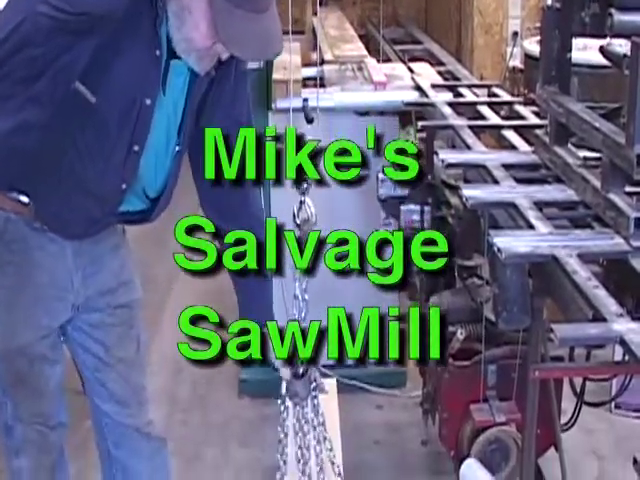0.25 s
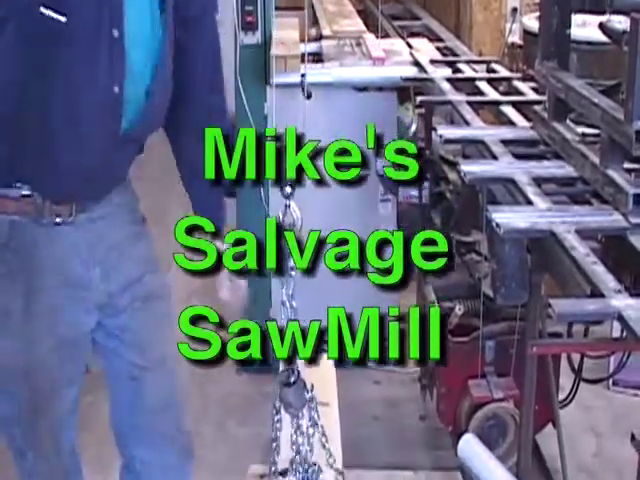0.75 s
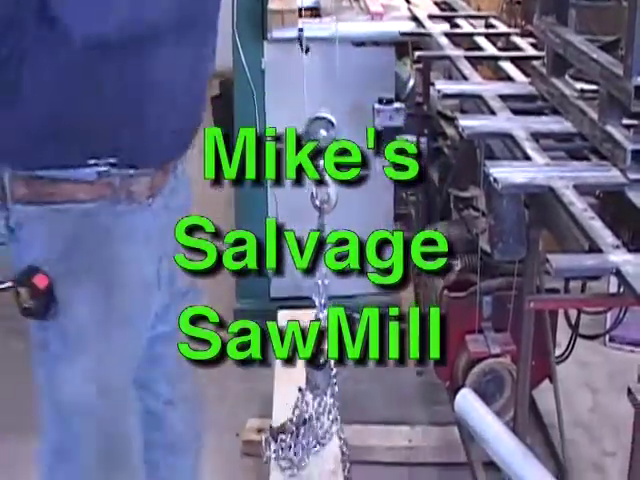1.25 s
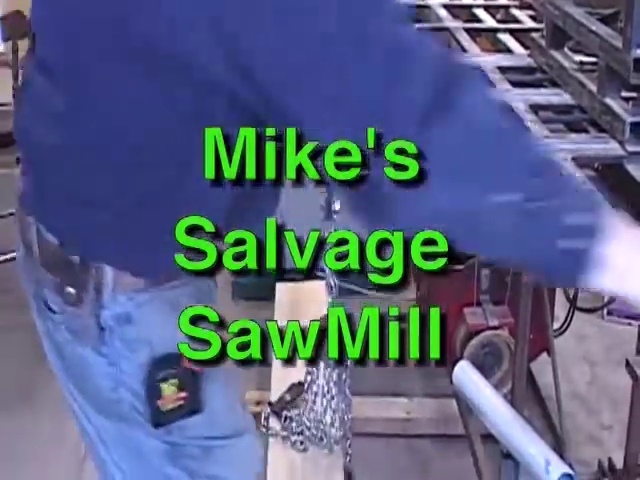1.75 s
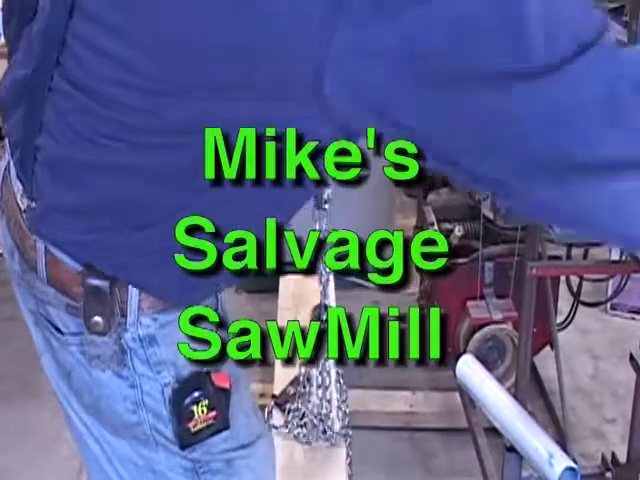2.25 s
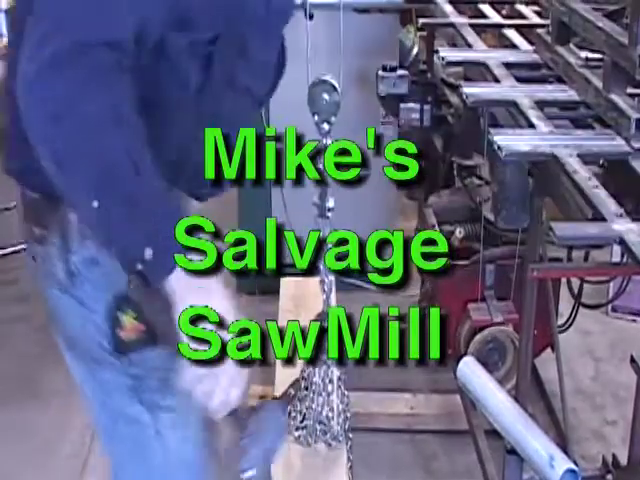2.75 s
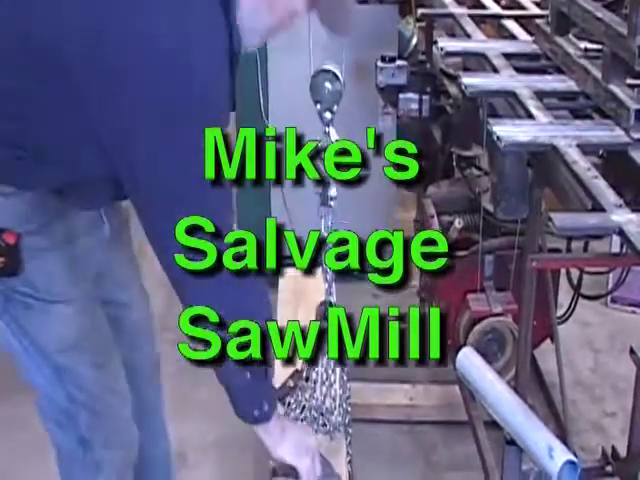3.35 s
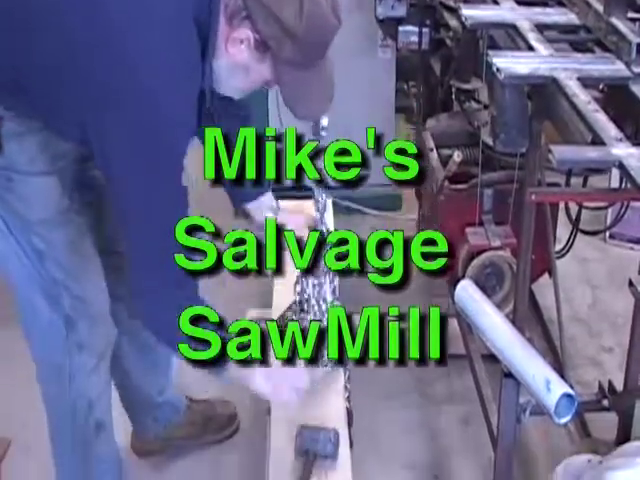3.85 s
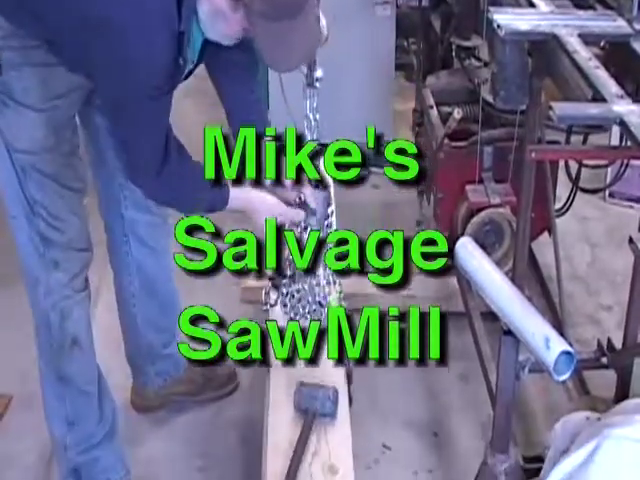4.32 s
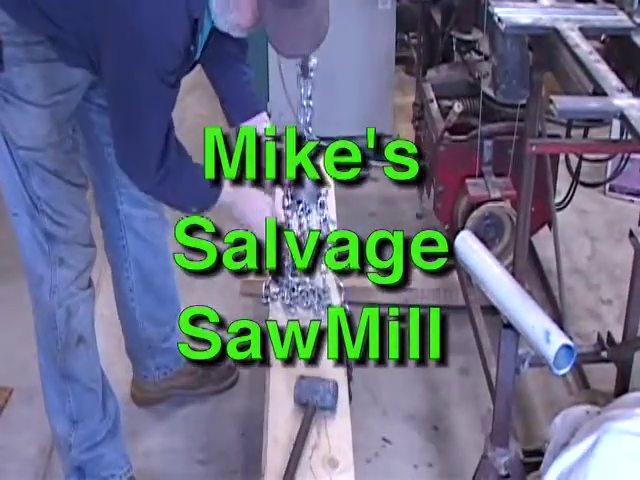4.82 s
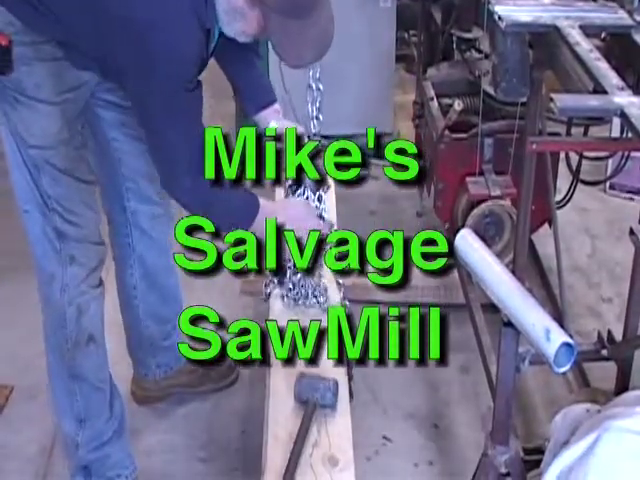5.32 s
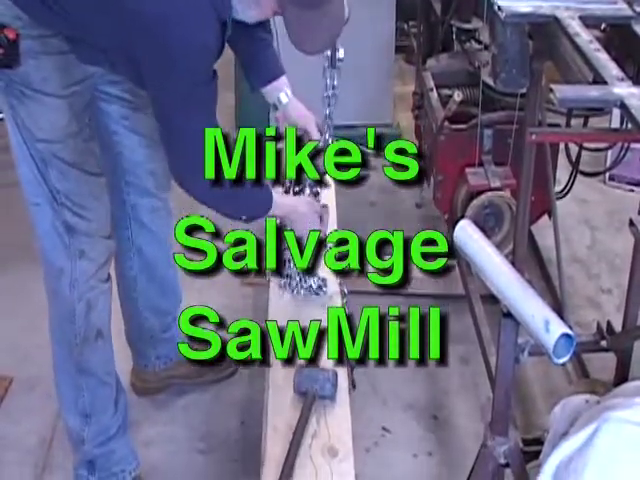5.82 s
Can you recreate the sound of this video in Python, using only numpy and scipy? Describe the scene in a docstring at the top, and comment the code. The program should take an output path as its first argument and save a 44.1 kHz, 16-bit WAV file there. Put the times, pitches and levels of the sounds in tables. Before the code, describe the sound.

Chain grinds and rattles along a metal frame for under a second, then a hard steel bang rings and the room answers. Lighter shackle clinks, hook jangles, very high link tinkles and boot scuffs come sparsely. Midway a hammer head knocks solidly on a plank. Afterward quiet chain clinks, a small wooden knock and a last brisk jangle. Heard close, in stereo, in a hard-walled workshop with low rumble and soft hum.

```python
"""First a steel chain drags over a steel frame in an echoing workshop; then links tinkle very high, hooks jangle,
boots scuff, and a sledge hammer is laid on a plank. Hum, rumble and hiss lie underneath.
Slides are gritty noise through broad resonances; links, hooks and the dragged frame are modes tapped at random.
Blows and knocks are decaying modes under noise bursts; thuds are low noise; the walls answer with decaying noise."""
import sys
import numpy as np
from scipy import signal
from scipy.fft import rfft, irfft, next_fast_len
from scipy.io import wavfile
from scipy.ndimage import uniform_filter1d

SR = 44100
rng = np.random.default_rng(int(sys.argv[2]) if len(sys.argv) > 2 else 0)


def transcribe(u):
    """Save the signal u as a 16-bit wav file named by the first command-line argument.

    u: samples, shape (n,) or (channels, n), limited to [-1, 1]; the rate is SR.
    q: integer samples, one column per channel.
    """
    v = np.clip(np.atleast_2d(u).T, -1, 1)
    q = np.round(v * 32767).astype(np.int16)
    wavfile.write(sys.argv[1], SR, q)


N = 268039

# rumble level over time: time_s, level_db
RUMBLE_LEVEL = [(0.0, -51), (0.42, -54), (0.52, -42.5), (1.06, -43), (1.54, -44.5), (2.0, -49), (2.12, -39),
                (2.67, -45.5), (3.01, -41.5), (3.54, -51), (3.66, -41.5), (4.06, -45.5), (4.91, -46.5),
                (5.35, -47.5), (5.5, -45), (6.08, -46.5)]
# rumble spectrum: freq_hz, density_db
RUMBLE_SPECTRUM = [(11, -41), (18, 20.5), (76, -3), (113, -28.5), (132, -4), (155, -8), (173, -15),
                   (203, -12), (300, -63), (390, -66), (660, -120)]
# hiss spectrum: freq_hz, density_db
HISS_SPECTRUM = [(88, -10), (150, -5.5), (168, -12.5), (283, -14), (468, -17.5), (578, -23), (701, -19.5),
                 (883, -25), (1950, -28), (13400, -34), (15000, -44)]
# hum tones: pitch_hz, level_db, drift_rms_hz
HUM_TONES = [(147.7, -54, 1.55), (204, -64, 18)]
# floor bumps and footfalls: start_s, hold_s, level_db
FLOOR_THUDS = [(0, .004, -48), (0.045, 0.33, -57), (0.408, .03, -52), (0.64, .11, -59.5), (1.498, .01, -49),
               (2.115, 0.091, -57.5), (3.046, 0.11, -63), (3.605, 0.19, -49.5), (3.912, 0.021, -48),
               (4.027, 0.023, -51.5)]
# plank modes: pitch_hz, level_db, t60_s
PLANK_MODES = [(208, -10, 0.056), (326.3, -2, 0.056), (441, -22, 0.19), (544, 13, 0.032), (698, 1.5, 0.17),
               (745, -8, 0.3), (860, -11, 0.083), (1058, -1, 0.06), (1150, -2, 0.18), (1330, -10, 0.026)]
# dull knocks on plank and floor: start_s, level_db, favoured_pitch_hz, ring_db, brightness_db_per_octave, top_hz
DULL_KNOCKS = [(1.488, -34, 990, 5.5, -5, 9350), (1.504, -43.5, 990, 5, -4.5, 12000),
               (1.512, -37.5, 1090, -2, 14, 12200), (1.529, -46, 320, 12, -4, 2930),
               (2.04, -60, 750, 4.5, -2, 1500), (2.343, -40, 540, -6, -5, 8000),
               (2.667, -46, 440, -12, -9.5, 1490), (2.744, -56, 500, -17, -19, 2500),
               (2.865, -50, 497, -17, 4, 6960), (3.011, -78.5, 500, -11, 11, 9900),
               (3.228, -31.5, 265, 2, -5, 5000), (3.643, -37.5, 724, -7.5, -23.5, 1410),
               (3.715, -28, 687, 5, -7, 5240), (3.74, -36, 330, 10, -16, 1500),
               (3.886, -25.5, 318, 9.5, -3, 6440), (4.006, -33, 358, 11, -3.5, 6350),
               (4.06, -35.5, 328, -9, -7, 4000), (5.195, -37.5, 510, -0.5, -5.5, 5800),
               (5.203, -39.5, 920, 1.5, 0, 1900), (5.226, -50, 514, -7, -1, 1900),
               (5.495, -61.5, 540, 1, 9, 1200)]
# two-tone fittings clanking: start_s, level_db, first_hz, second_hz, second_re_first_db
FITTING_CLANKS = [(.04, -35, 3600, 7900, -1), (.075, -38, 3590, 8260, 1), (.262, -32, 3750, 8260, -5),
                  (.3, -30.5, 3450, 8230, -12), (.38, -28.5, 3700, 8160, -7), (.46, -31.5, 4010, 8500, -25),
                  (.919, -32.5, 5660, 9330, -7.5), (4.287, -57, 2930, 3890, -7),
                  (4.345, -57.5, 3030, 3720, -3), (4.483, -44, 3006, 3880, -3),
                  (4.67, -58.5, 6370, 5800, -5), (4.75, -50, 4920, 6480, -14),
                  (4.82, -53.5, 3140, 3470, 6.5), (5.35, -59, 3290, 3530, -2),
                  (5.724, -42.5, 2920, 4680, -2), (5.751, -55, 2900, 4530, -1), (5.763, -38, 2756, 8070, 9),
                  (5.774, -39, 3680, 8040, -8), (6.044, -44, 3010, 3900, -8)]
# blows on frame, shackle, hammer: start_s, level_db, crack_db, brightness_db_per_octave
FRAME_HITS = [(0.603, -37, 9.5, -4), (0.689, -17.5, 3.5, 1)]
SHACKLE_HITS = [(1.0839, -28, 0.0086, 0), (1.0989, -34, 0.0048, 0)]
HAMMER_HITS = [(3.716, -40.5, 3.3, -6.5), (3.8848, -25.5, 2, -1.9), (4.0049, -33, 2.7, 1)]
# modes of frame, shackle, hammer head: pitch_hz, level_db, t60_s
FRAME_MODES = [(656, 0.5, 0.073), (919.3, 3.5, 0.2), (1120, -11, .1), (1344, -19, 0.087), (1720, -29, 0.11),
               (2920, -5.5, 0.058), (3134, -3.5, 0.26), (3309, 4, 0.12), (3334, -10.5, 0.1),
               (4910, -1, .05)]
SHACKLE_MODES = [(1063, -0.5, 0.044), (3160, -8, 0.16), (6700, 0, 0.19), (8850, 4, 0.052),
                 (12900, 4, 0.056)]
HAMMER_MODES = [(1140, -4.5, 0.14), (1382, -4.5, 0.15), (1523, -7, 0.28), (2140, 6.5, 0.037),
                (2930, -5.5, 0.13), (4550, -5, 0.093), (4130, 0.5, 0.19), (5360, -5, 0.19),
                (7430, -8.5, 0.32)]
# hook modes: pitch_hz, level_db, t60_s
HOOK_MODES = [(1816, -15, 0.13), (2780, -22, 0.27), (2880, 1, 0.097), (3052, 3.5, 0.076),
              (3100, -30, 0.081), (4235, -6, 0.12), (4750, -7.5, 0.093), (5200, -7.5, 0.1),
              (6330, -4, 0.087), (6500, -15, 0.48), (7540, -10.5, 0.16), (7860, -10.5, 0.14),
              (8120, -8.5, 0.1), (8980, -8, 0.088), (10080, -8, 0.05), (11150, -19, 0.12), (12360, -12, .1)]
# hooks jangling against the chain: start_s, hold_s, level_db, brightness_db_per_octave
HOOK_JANGLES = [(0.911, 0.13, -49, 1.5), (1.033, 0.1, -56.5, 1), (1.134, .06, -59, -11),
                (1.32, 0.05, -63, 5), (1.46, 0.043, -62, 4), (1.75, 0.025, -60, -12),
                (1.825, 0.026, -38, 1.5), (1.862, 0.039, -39, -6.5), (1.927, 0.075, -62, -12),
                (2.056, 0.12, -75.5, 8), (4.288, .004, -74, -9), (4.347, .13, -75, -12),
                (4.49, 0.027, -65.5, 1), (4.7, 0.039, -69, -4), (4.757, 0.066, -58.5, -6),
                (4.83, 0.021, -57, -9.5), (4.924, 0.12, -70.5, -2), (5.616, .03, -51, -3),
                (5.716, .002, -53, 3), (5.752, 0.0022, -35.5, -2.5), (5.8, 0.16, -65, -4),
                (6.001, 0.048, -60, 1)]
# link modes: pitch_hz, level_db, t60_s
LINK_MODES = [(14440, -3, 0.077), (14490, -9.5, 0.13), (14535, 3.5, 0.089), (14590, -18, 0.12),
              (14630, -33, .15)]
# links touching each other: start_s, hold_s, level_db
LINK_TINKLES = [(.01, 0.056, -53), (0.292, .01, -58), (0.553, 0.16, -55), (0.812, 0.013, -45.5),
                (0.908, 0.17, -58), (1.076, 0.018, -43.5), (1.22, .005, -64), (1.332, 0.018, -57),
                (1.487, 0.017, -31), (1.6, .06, -66), (1.848, .005, -77), (2.497, .01, -74),
                (2.81, .06, -76), (3.947, 0.036, -56), (4.426, 0.023, -60), (4.994, .1, -73.5),
                (5.144, .005, -70), (5.624, 0.17, -51.5), (5.91, .03, -68), (5.977, 0.011, -61),
                (6.06, .02, -78)]
# single sharp link contacts: start_s, level_db, click_re_level_db
LINK_CLINKS = [(0.8847, -49, 11), (1.2145, -42, -4), (1.4285, -54, 4), (1.4981, -35.5, 5),
               (2.488, -47.5, -4), (2.807, -52, 3), (4.3802, -55, 3), (4.9951, -43, -1), (5.0907, -48, -21),
               (5.1395, -47.5, -7), (5.611, -41, 2), (5.907, -38.5, -10), (5.993, -27, -14.5)]
# chain running over the frame: time_s, level_db, brightness_db_per_octave
CHAIN_DRAG = [(0.0, -40, 0.5), (0.096, -37, 0), (0.184, -40.5, 0), (0.4, -39, 0.5), (0.58, -43, -0.5),
              (.62, -38.5, 1), (0.68, -36, 0)]
# short slides of chain and boots: peak_s, level_db, rise_s_per_20db, fall_s_per_20db, brightness_db_per_octave
SHORT_SCUFFS = [(.84, -46, 0.0056, 0.13, -1.2), (1.103, -43, 0.17, 0.0071, -1),
                (1.332, -63.5, 0.67, 0.13, -1.5), (1.492, -54.5, 0.09, 0.69, 3),
                (1.813, -56, 0.01, 0.015, -6.5), (2.32, -57.5, 0.05, 0.064, -7.5),
                (2.361, -45.5, 0.043, 0.081, 2), (2.746, -61, 0.0093, .01, -10.5),
                (2.862, -65.5, 0.25, 0.077, 1.5), (3.004, -60.5, 0.13, 0.055, -2),
                (3.25, -48.5, .005, 0.062, -10), (3.345, -49.5, 0.21, 0.15, 3), (3.6, -61, 0.12, .005, -3),
                (4.73, -61, 0.034, 0.19, 1.8), (5.0, -69.5, 0.086, .005, 1.5),
                (5.636, -48.5, 0.038, 0.16, 5), (5.76, -45.5, 0.045, 0.087, 8.5),
                (5.99, -46, 0.0088, 0.045, 4), (6.042, -54, .013, .15, 10)]
# broad resonances of what is rubbed: freq_hz, density_db
SLIDE_SPECTRUM = [(88, -41), (150, -3.5), (314, -14.5), (352, -8), (426, -12), (460, -7), (928, -6),
                  (1800, -8.5), (2220, -10.5), (3570, -10.5), (8230, -19.5), (13200, -39), (14000, -27.5)]
# decay of the workshop: freq_hz, t60_s
SHOP_DECAY = [(200, 0.66), (1000, 0.56), (4000, 0.49), (14000, 0.3)]
# left-right likeness of chain and blows, then of the background: freq_hz, likeness (-1 to 1)
NEAR_LIKENESS = [(60, 0.059), (130, -0.025), (290, 0.42), (3000, 0.48), (7000, 0.41), (15000, -0.024)]
FAR_LIKENESS = [(25, -0.92), (45, -0.9), (70, 0.029), (130, -0.74), (300, 0.5), (1500, 0.15), (7000, 0.61),
                (15000, -0.063)]
# lead of the left port over the right: freq_hz, lead_rad
LEFT_LEAD = [(1000, 0.22), (4000, 0.64), (8000, 1.62), (10000, 1.57), (11500, 0.97), (14500, 4.3)]

HISS_DB, HUM_LEFT_DB = -64, 3.06  # hum: left raised, right lowered by this much
# each rise and fall spans 20 dB
THUD_RISE_S, THUD_FALL_S = 0.023, 0.075
JANGLE_RISE_S, JANGLE_FALL_S = 0.014, 0.022
TINKLE_RISE_S, TINKLE_FALL_S = 0.029, .06
ROLLOFF_HZ, TOP_HZ = 14800, 16150


def amp(db):
    """Amplitude ratio of a level in dB."""
    return 10 ** (np.asarray(db) / 20)


def unit(x):
    """Scale to RMS 1."""
    return x / np.sqrt(np.mean(x ** 2) + 1e-20)


def along(points, hz):
    """Interpolate (freq_hz, value) points on a log frequency axis."""
    f, v = np.transpose(points)
    return np.interp(np.log(hz + 1), np.log(f + 1), v)


def curves(rows):
    """Smoothed gain and further columns per sample; silent outside the table."""
    t = np.arange(N) / SR
    time_s, level_db, *cols = np.transpose(rows)
    gain = amp(np.interp(t, time_s, level_db, left=-200, right=-200))
    return [uniform_filter1d(gain, size=300)] + [np.interp(t, time_s, c) for c in cols]


def bursts(start_s, hold_s, level_db, rise_s, fall_s, *cols):
    """Summed gain of bursts that rise, hold and fall evenly in dB; further columns follow the loudest burst."""
    since_s = np.arange(0, N / SR + .002, .001)[:, None] - start_s  # 1 ms grid
    early = np.maximum(-since_s, 0) / rise_s
    late = np.maximum(since_s - hold_s, 0) / fall_s
    gains = amp(level_db - 20 * (early + late)) + 1e-12
    power = gains ** 2
    rows = [gains.sum(axis=1)] + [power @ c / np.sum(power, axis=1) for c in cols]
    t_ms = np.arange(N) / SR * 1000
    return [uniform_filter1d(np.interp(t_ms, np.arange(len(r)), r), size=300) for r in rows]


def filtered(x, response):
    """Multiply the spectrum by a complex response of frequency."""
    m = next_fast_len(N + SR // 2)
    return irfft(rfft(x, m) * response(np.fft.rfftfreq(m, 1 / SR)), m)[..., :N]


def spread(pair, likeness):
    """Mix two unrelated signals into left and right of the given likeness."""
    turn = lambda hz: np.arccos(np.clip(along(likeness, hz), -1, 1)) / 2
    mid, side = filtered(pair, lambda hz: np.array([np.cos(turn(hz)), np.sin(turn(hz))]))
    return np.array([mid + side, mid - side])


def ring(x, hz, t60_s):
    """One two-pole mode: a unit impulse rings with amplitude 1 before decay."""
    r, w = amp(-60 / (t60_s * SR)), 2 * np.pi * hz / SR
    return signal.lfilter([np.sin(w)], [1, -2 * r * np.cos(w), r * r], x)


def contacts(rate_per_s, scatter_db):
    """Random impulses of uneven size."""
    hits = rng.random(N) < rate_per_s / SR
    return hits * amp(scatter_db * rng.standard_normal(N))


def rattled(gain, bright, modes, rate_per_s, scatter_db, detune):
    """Random contacts on three like pieces, detuned by a fraction; each contact drives every mode anew."""
    energy = sum(amp(2 * db) * t60_s for _, db, t60_s in modes)
    size = np.sqrt(3 * energy * SR / (4 * np.log(1000)))  # expected RMS of the ringing
    out = np.zeros(N)
    for piece in (-1, 0, 1):
        taps = gain * unit(contacts(rate_per_s, scatter_db))
        for hz, db, t60_s in modes:
            tilt_db = np.clip(bright, -6, 4) * np.log2(hz / 3000)
            strength = amp(db + tilt_db) * rng.standard_normal(N)
            out += ring(taps * strength, hz * (1 + detune * piece), t60_s)
    return out / size


def blow(modes, crack_db, crack_t60_s, colour, wander_rad):
    """Decaying modes of random strength and wandering phase (rad RMS per cycle), with a coloured noise burst."""
    t = np.arange(SR // 2) / SR
    hz, level_db, t60_s = np.transpose(modes)[:, :, None]
    steps = rng.standard_normal((len(modes), len(t)))
    wander = wander_rad * np.cumsum(steps, axis=1) * np.sqrt(hz / SR)
    size = amp(level_db + rng.normal(0, 2, hz.shape) - 60 * t / t60_s)
    tone = np.sum(size * np.sin(2 * np.pi * hz * t + wander), axis=0)
    spectrum = rfft(rng.standard_normal(len(t))) * colour(np.fft.rfftfreq(len(t), 1 / SR) + 1)
    crack = amp(crack_db - 60 * t / crack_t60_s) * unit(irfft(spectrum, len(t)))
    return (tone + crack) * (1 - np.exp(-t / 0.00041))  # soft onset


def struck(hits, modes, crack_hz, crack_t60_s, wander_rad):
    """Blows on one steel object: tilted modes plus a broad-band crack around crack_hz."""
    out = np.zeros(N + SR)
    for start_s, level_db, crack_db, bright in hits:
        tilt_db = lambda hz: bright * np.log2(hz / crack_hz)
        colour = lambda hz: amp(tilt_db(hz)) * hz / (crack_hz + hz ** 4 / crack_hz ** 3)
        tilted = [(hz, db + tilt_db(hz), t60_s) for hz, db, t60_s in modes]
        hit = blow(tilted, crack_db, crack_t60_s, colour, wander_rad)
        out[round(start_s * SR):][:SR // 2] += amp(level_db - 8.5) * hit
    return out[:N]


def background():
    """Shaped-noise rumble and hiss, and slowly drifting hum tones, stronger on the left."""
    def noise(points):
        return unit(filtered(rng.standard_normal((2, N)), lambda hz: amp(along(points, hz))))

    rumble = curves(RUMBLE_LEVEL)[0] * noise(RUMBLE_SPECTRUM)
    hiss = amp(HISS_DB) * noise(HISS_SPECTRUM)
    left_right = np.array([[1.], [-1.]])
    hum = 0
    for hz, db, drift_rms_hz in HUM_TONES:
        drift_hz = unit(uniform_filter1d(rng.standard_normal(N), size=SR // 10)) * drift_rms_hz
        phase = 2 * np.pi * np.cumsum(hz + drift_hz) / SR + left_right  # the left port leads
        hum = hum + amp(db + HUM_LEFT_DB * left_right) * np.sin(phase)
    return spread(rumble + hiss, FAR_LIKENESS) + hum


def thuds():
    """Floor bumps and footfalls: soft bursts of noise around 80 Hz, alike at both ports."""
    band = lambda hz: 1 / (1 + ((hz - 80) / 34) ** 4)
    gain, = bursts(*np.transpose(FLOOR_THUDS), THUD_RISE_S, THUD_FALL_S)
    return gain * unit(filtered(rng.standard_normal(N), band))


def knocks():
    """The place of a knock favours the plank modes near one pitch; soft contact cuts the treble."""
    out = np.zeros(N + SR)
    for start_s, level_db, pitch_hz, ring_db, bright, top_hz in DULL_KNOCKS:
        modes = [(hz, db + ring_db - 60 * np.log2(hz / pitch_hz) ** 2, t60_s)
                 for hz, db, t60_s in PLANK_MODES]

        def colour(hz):
            low_cut = 1 + (.6 * min(pitch_hz, 500) / hz) ** 4
            high_cut = 1 + (hz / top_hz) ** 8
            return amp(bright * np.log2(hz / 1000)) / low_cut / high_cut

        hit = blow(modes, 0, 0.099, colour, wander_rad=0.18)
        out[round(start_s * SR):][:SR // 2] += amp(level_db - 5.5) * hit
    return out[:N]


def clanks():
    """Fittings struck once each, ringing in two tones."""
    out = 0
    for start_s, level_db, first_hz, second_hz, second_db in FITTING_CLANKS:
        modes = [(first_hz, 3, .09), (second_hz, 3 + second_db, .09)]
        out = out + struck([(start_s, level_db, 2, 0)], modes, first_hz, crack_t60_s=.03, wander_rad=.5)
    return out


def blows():
    """Struck modes of steel frame, shackle, hammer head and fittings, with the plank knocks."""
    frame = struck(FRAME_HITS, FRAME_MODES, crack_hz=2600, crack_t60_s=0.14, wander_rad=0.44)
    shackle = struck(SHACKLE_HITS, SHACKLE_MODES, crack_hz=5250, crack_t60_s=0.034, wander_rad=0.33)
    hammer = struck(HAMMER_HITS, HAMMER_MODES, crack_hz=2900, crack_t60_s=0.11, wander_rad=0.36)
    return frame + shackle + hammer + clanks() + knocks()


def hooks():
    """Heavier fittings on the chain jangle in clusters of contacts."""
    start_s, hold_s, level_db, bright = np.transpose(HOOK_JANGLES)
    gain, bright = bursts(start_s, hold_s, level_db, JANGLE_RISE_S, JANGLE_FALL_S, bright)
    return rattled(gain, bright, HOOK_MODES, rate_per_s=300, scatter_db=7, detune=0.00893)


def links():
    """Small links ring near the top of hearing; sharp contacts add a broad click."""
    gain, = bursts(*np.transpose(LINK_TINKLES), TINKLE_RISE_S, TINKLE_FALL_S)
    out = rattled(gain, 0, LINK_MODES, rate_per_s=40, scatter_db=4, detune=.001)
    out = filtered(out, lambda hz: 1 / (1 + ((hz - 14530) / 220) ** 4))  # only the ringing band
    t = np.arange(200) / SR
    for start_s, level_db, click_db in LINK_CLINKS:
        click = amp(level_db + click_db - 60 * t / 0.0076) * rng.standard_normal(len(t))
        out[round(start_s * SR):][:len(t)] += click
    hits = [(start_s, level_db, -9, 0) for start_s, level_db, _ in LINK_CLINKS]
    return out + struck(hits, LINK_MODES, crack_hz=14000, crack_t60_s=.003, wander_rad=0.022)


def drag():
    """While the chain runs over the steel frame, its links keep the frame ringing."""
    gain, _ = curves(CHAIN_DRAG)
    return amp(-7.0) * rattled(gain, 0.029, FRAME_MODES, rate_per_s=100, scatter_db=5.0, detune=0.0932)


def slides():
    """Dense gritty contacts through the broad resonances of what is rubbed; harder surfaces sound brighter."""
    dragged, drag_bright = curves(CHAIN_DRAG)
    peak_s, level_db, rise_s, fall_s, hardness = np.transpose(SHORT_SCUFFS)
    scuffed, scuff_bright = bursts(peak_s, 0, level_db, rise_s, fall_s, hardness)
    gain = dragged + scuffed
    bright = np.where(dragged > scuffed, drag_bright, scuff_bright)

    grit = unit(contacts(2500, scatter_db=4) * np.sign(rng.standard_normal(N)))
    grit = grit + .9 * rng.standard_normal(N)
    hz, t, z = signal.stft(grit, SR, nperseg=512)
    tilt_db = np.log2((hz[:, None] + 100) / 2000) * np.interp(t, np.arange(N) / SR, bright)
    patches = uniform_filter1d(rng.standard_normal(z.shape), size=4, axis=0)
    patches = unit(uniform_filter1d(patches, size=8, axis=1))  # uneven in time and frequency
    z = z * amp(along(SLIDE_SPECTRUM, hz)[:, None] + tilt_db + 2 * patches)
    z = z / np.sqrt(uniform_filter1d(np.mean(abs(z) ** 2, axis=0), size=15))  # level out over time
    return gain * unit(signal.istft(z, SR, nperseg=512)[1][:N])


def shop(x, wet_db):
    """Direct sound plus the walls' answer: a noise tail, new for each overlapping stretch, decaying by frequency."""
    hop = SR // 4
    wet = np.zeros((2, N + 2 * SR))
    padded = np.pad(x, (hop, 2 * hop))
    window = np.sin(np.arange(2 * hop) * np.pi / (2 * hop))
    for start in range(0, N + hop, hop):
        hz, t, z = signal.stft(rng.standard_normal((2, SR // 2)), SR, nperseg=256)
        decay = amp(-60 * t / along(SHOP_DECAY, hz)[:, None])
        tail = signal.istft(z * decay, SR, nperseg=256)[1]
        tail = tail / np.linalg.norm(tail, axis=1, keepdims=True)
        piece = padded[start:start + 2 * hop] * window
        echo = signal.fftconvolve(piece[None], tail, axes=1)
        wet[:, start:start + echo.shape[1]] += echo
    mid, side = wet[:, hop - 150:][:, :N]  # answer starts 150 samples late
    return spread(np.array([x + amp(wet_db) * mid, amp(wet_db - 2) * side]), NEAR_LIKENESS)


def scene():
    """Background and thuds stay dry; the other sources sound in the shop."""
    bed = background() + thuds()
    struck_steel_and_plank = shop(blows(), wet_db=-2.5)
    fittings = shop(hooks(), wet_db=-5.5) + shop(links(), wet_db=-0.5)
    return bed + struck_steel_and_plank + fittings + shop(slides() + drag(), wet_db=-5.0)


def record(dry):
    """Two close ports, the left leading; treble rolls off sharply and nothing passes above TOP_HZ."""
    lead = lambda hz: np.exp(.5j * along(LEFT_LEAD, hz) * np.array([[1], [-1]]))
    rolloff = lambda hz: .02 + 1 / (1 + (hz / ROLLOFF_HZ) ** 150)
    return filtered(dry, lambda hz: lead(hz) * rolloff(hz) * (hz < TOP_HZ))


dry = scene()
out = record(dry)
transcribe(out)
```